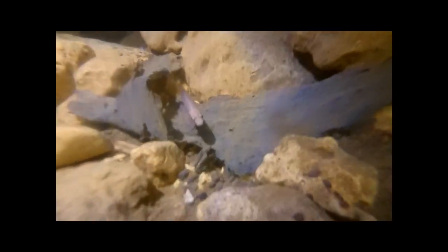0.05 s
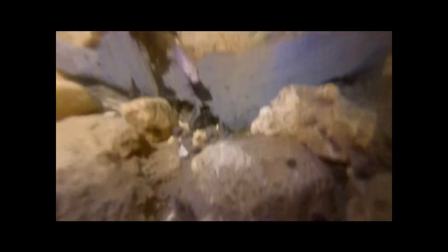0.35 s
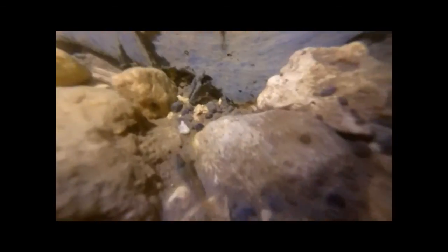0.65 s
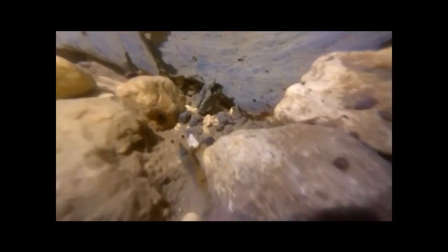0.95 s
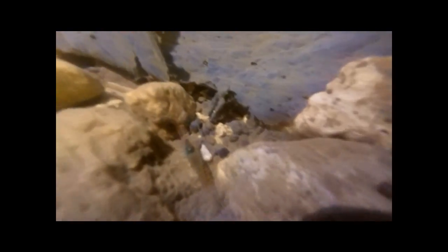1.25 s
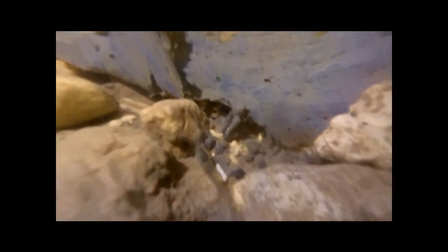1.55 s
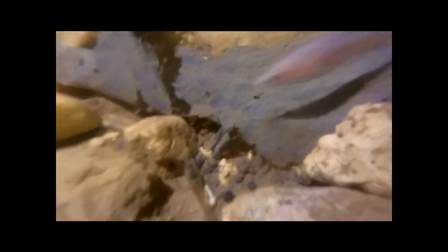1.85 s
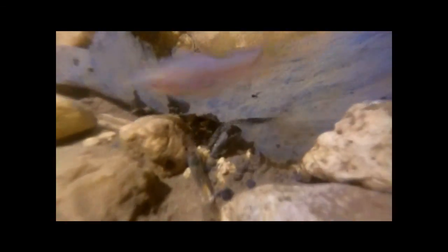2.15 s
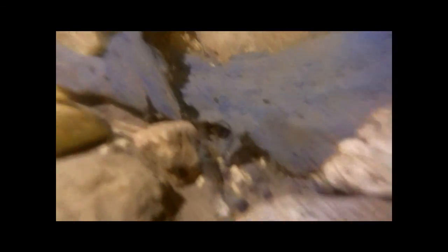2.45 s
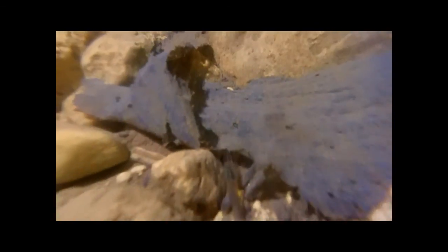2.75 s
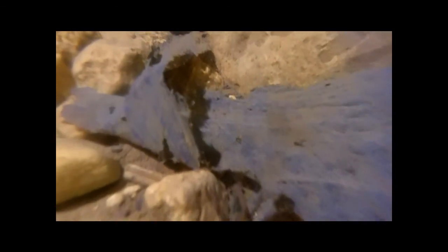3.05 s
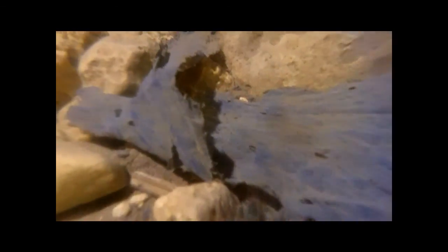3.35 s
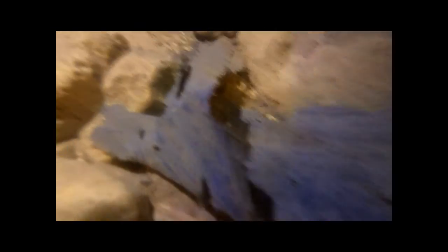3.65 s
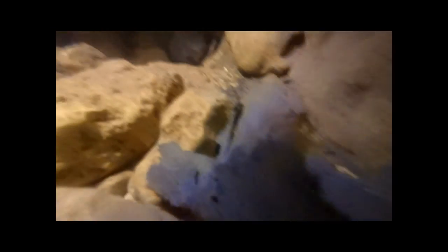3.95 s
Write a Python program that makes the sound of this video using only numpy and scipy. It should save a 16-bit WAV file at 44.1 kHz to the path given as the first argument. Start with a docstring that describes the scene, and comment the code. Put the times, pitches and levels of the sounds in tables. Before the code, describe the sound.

Water drips into a still pool in a quiet rock hollow: one clear plop, two faint ones, then another clear one. Underneath, a hand-held microphone picks up deep rumble, soft rustling and a thin, high hiss.

```python
"""A quiet rock hollow with a still pool, heard through the microphone of a hand-held camera.
Air and the moving hand make a deep rumble and, right at the microphone, a soft rustle.
Two clear drips and two faint ones plop, short and dry; a weak low tone rings near the end.
A thin, high hiss flickers and dips briefly, with fine ticking and a tiny pip about once a second."""
import sys
import numpy as np
from scipy import signal
from scipy.fft import rfft, irfft
from scipy.io import wavfile
from scipy.ndimage import uniform_filter1d

SR = 44100
rng = np.random.default_rng(int(sys.argv[2]) if len(sys.argv) > 2 else 0)


def bounce(signal):
    """Save signal as a 16-bit WAV file at the path given by the first command-line argument."""
    frames = np.transpose(np.atleast_2d(signal))
    limited = np.clip(frames, -1, 1)
    pcm = np.round(limited * 32767).astype(np.int16)
    wavfile.write(sys.argv[1], SR, pcm)


N = 176400


def undb(db):
    """Decibels to gain."""
    return 10 ** (np.asarray(db) / 20)


def curve(rows):
    """Gain over time through points of t/s, level/dB."""
    return undb(np.interp(np.arange(N) / SR, *np.array(rows).T))


def noise(colour):
    """Noise of rms 1, its spectrum shaped by points of f/Hz, level/dB and falling past both ends."""
    hz, db = np.array(colour, float).T
    f = np.maximum(np.arange(N // 2 + 1) * SR / N, 1e-3)
    gain = undb(np.interp(np.log(f), np.log(hz), db))
    skirts = np.minimum(f / hz[0], 1) ** 2 * np.minimum(hz[-1] / f, 1) ** 2
    y = irfft(rfft(rng.standard_normal(N)) * gain * skirts, N)
    return y / y.std()


def walk(rate):
    """Smooth random drift of spread 1, changing about rate times a second."""
    step = max(int(SR / rate), 1)
    stairs = np.repeat(rng.standard_normal(N // step + 1), step)
    y = uniform_filter1d(stairs, step)[:N]
    return y / y.std()


def swells(rows, attack_s, release_s):
    """Envelope that rises, holds and dies away for each row of t/s, length/s, level/dB."""
    t, power = np.arange(N) / SR, np.zeros(N)
    for start, length, db in rows:
        rise = np.clip((t - start) / attack_s, 0, 1)
        fall = np.exp(-np.maximum(t - start - length, 0) / release_s)
        power += (undb(db) * rise * fall) ** 2
    return np.sqrt(power)


def fade(t, t60):
    """Decay by 60 dB in t60 seconds."""
    return np.exp(-np.log(1000) * t / t60)


def rumble():
    """Slow air pressure and the sway of the hand, felt by the microphone as a deep rumble."""
    # rumble spectrum: f/Hz, level/dB
    colour = [(3, 3.5), (10, -9), (20, -6.5), (30, -17), (42, -26.5), (60, -34.5), (80, -42.5), (120, -50),
              (250, -62.5), (600, -77)]
    # its rise and fall: t/s, level/dB
    levels = [(0, -41), (.22, -51.5), (.32, -39.5), (.72, -43), (.85, -46), (.97, -42.5), (1.3, -45.5),
              (2.0, -46.5), (2.35, -47.5), (2.6, -47.5), (3.2, -51), (3.6, -51), (4, -42.5)]
    return noise(colour) * curve(levels)


def still_air():
    """The steady, faint wash of air in the hollow."""
    # air spectrum: f/Hz, level/dB
    colour = [(60, 9), (130, -2.5), (250, -5.5), (450, -8.5), (680, -8.5), (850, -12.5), (1500, -14.5),
              (2700, -15.5), (3500, -18), (5000, -19.5), (8000, -19.5), (15000, -26)]
    return noise(colour) * undb(-78)


def side_air():
    """The trace of air that differs between left and right."""
    # spectrum of that trace: f/Hz, level/dB
    colour = [(25, 38), (60, 22.5), (125, 2), (500, -8), (2000, -3.5), (4500, 3.5), (8000, -2.5),
              (15000, -15)]
    return noise(colour) * undb(-93)


def high_hiss():
    """A thin, high hiss that flickers and dips briefly."""
    # hiss spectrum: f/Hz, level/dB
    colour = [(4500, -16.5), (5100, -14.5), (5280, -3.5), (5800, -10.5), (7300, -10.5), (8000, -1.5),
              (8250, -6.5), (8550, 3), (9100, 3), (9400, -8.5), (10150, -13), (10480, -1.5), (10900, -6.5),
              (11900, -2), (12500, -4.5), (13300, 0), (14300, -2), (15300, -5.5)]
    # slow drift, before dips and flicker: t/s, level/dB
    levels = [(0, -81.5), (.7, -83.5), (1.1, -80), (1.6, -83.5), (2.0, -81), (3.25, -81), (3.6, -84.5),
              (4, -82)]
    # brief dips: t/s, length/s
    dips = [(0.624, .04), (0.725, 0.077), (0.847, 0.08), (1.321, 0.077), (1.45, 0.077), (1.61, 0.059),
            (1.723, 0.076), (1.88, 0.037), (3.356, 0.037), (3.432, 0.061), (3.662, 0.1), (3.81, 0.022),
            (3.92, 0.074)]
    dip_db, edge_s = -9.5, 0.004
    t = np.arange(N) / SR
    dipped = sum((t > start) * (t < start + length) * 1. for start, length in dips)
    dipped = uniform_filter1d(dipped, int(edge_s * SR) + 1)
    return noise(colour) * curve(levels) * undb(dip_db * dipped + walk(rate=58))


def ticks():
    """Very fine, irregular high ticks in the hiss; each sets off a short burst of sizzle."""
    # ringing modes of a tick: f/Hz, relative level/dB
    modes = [(5290, -6.5), (5700, -9.5), (6050, -20.5)]
    # sizzle spectrum: f/Hz, level/dB
    sizzle_colour = [(5200, -5.5), (6500, -9), (7900, -4), (8700, 1.5), (9600, -5.5), (10200, -3),
                     (10480, 5), (10850, -6), (12000, -5.5), (14500, -4)]
    ticks_per_s, sizzle_db = 16, -4.5
    t = np.arange(SR // 8) / SR
    ring = sum(undb(db) * np.sin(2 * np.pi * hz * t) for hz, db in modes) * fade(t, t60=0.02)
    spacing, strength = rng.random(size=(120, 2)).T
    gaps_s = (.25 + 2.25 * spacing ** 2) / ticks_per_s
    onsets = (np.cumsum(gaps_s) * SR).astype(int)
    kicks = np.bincount(onsets, undb(-73 + 4 * strength), N)[:N]
    bursts = signal.fftconvolve(kicks, fade(t, t60=0.073))[:N]
    sizzle = undb(sizzle_db) * bursts * noise(sizzle_colour)
    return signal.fftconvolve(kicks, ring)[:N] + sizzle


def pips():
    """Tiny high blips of electrical interference."""
    # peak of each pip: t/s, level/dB
    peaks = [(.18, -76), (.972, -82), (1.957, -77), (2.981, -74)]
    # partials of a pip: f/Hz, relative level/dB
    partials = [(9000, 1), (12350, -8), (13520, 7.5)]
    half_width_s = .0055
    t = np.arange(N) / SR
    whine = sum(undb(db) * np.sin(2 * np.pi * hz * t) for hz, db in partials)
    return whine * sum(undb(db) * np.exp(-((t - at) / half_width_s) ** 2) for at, db in peaks)


def handling():
    """The hand on the camera body: uneven rubbing, soft bumps, light brushing and one faint click."""
    # spectra of the four kinds of contact: f/Hz, level/dB
    rub_colour = [(80, -7), (180, 1), (300, -2), (440, -2.5), (530, -6.5), (650, 4), (730, -10), (850, -18),
                  (1500, -33.5), (3000, -44), (6000, -56)]
    bump_colour = [(50, 4.5), (110, 4.5), (200, -3.5), (390, -5), (550, -18), (900, -25.5), (2500, -27.5),
                   (6000, -38)]
    brush_colour = [(700, 2.5), (1200, -8.5), (2600, -4), (3500, -15), (6000, -9), (10000, -16.5)]
    click_colour = [(1500, -8), (2600, -1), (4200, -7), (6000, -13)]
    # touches of the hand: t/s, length/s, level/dB
    rubs = [(.30, 0.14, -78.5), (.46, 0.288, -75.5), (.78, 0.24, -84.5), (1.09, 0.13, -78.5),
            (1.26, 0.22, -83.5), (1.67, .22, -74.5), (1.9, 0.21, -82.5), (3.08, .35, -75.5),
            (3.44, 0.48, -81), (3.9, 0.16, -76.5)]
    bumps = [(.25, 0.097, -72), (.66, 0.061, -68.5), (.94, 0.038, -67.5), (1.07, 0.039, -78),
             (1.35, 0.023, -80), (1.97, 0.03, -70), (2.08, 0.021, -85), (2.57, 0.013, -66),
             (2.90, 0.018, -71.5), (3.19, .04, -83)]
    brushes = [(.32, 0.3, -82)]
    rub_rough_db, brush_rough_db = 1.5, 2
    rub = noise(rub_colour) * swells(rubs, attack_s=0.01, release_s=.025)
    rub *= undb(rub_rough_db * walk(rate=45))
    bump = noise(bump_colour) * swells(bumps, attack_s=0.0034, release_s=0.023)
    brush = noise(brush_colour) * swells(brushes, attack_s=0.01, release_s=.025)
    brush *= undb(brush_rough_db * walk(rate=60))
    click = noise(click_colour) * swells([(1.399, 0.0012, -75.5)], attack_s=0.00066, release_s=0.003)
    return rub + bump + brush + click


def drips():
    """Each drop on the pool makes a hollow thud, a briefly ringing bubble and a trace of splash."""
    # drops: t/s, level/dB, bubble f/Hz, bubble relative level/dB, bubble t60/s
    drops = [(1.1903, -48.5, 1297, 10.5, 0.028), (2.0685, -69, 933, 12, 0.024),
             (2.8680, -66.5, 680, -7, 0.01), (3.4676, -47, 1248, 8.5, 0.034)]
    # modes of the thud under every drop: f/Hz, relative level/dB, t60/s
    thud_modes = [(158, -24, 0.06), (402, -1, 0.037), (452, -2, 0.045), (640, 3, 0.021), (1040, -17, 0.03)]
    # splash spectrum: f/Hz, level/dB
    splash_colour = [(1500, -6), (2300, 8.5), (2900, -9), (3500, -4.5), (4500, -13)]
    bubble_attack_s, plop_top_hz, splash_db = 0.0012, 1420, -23.5
    out, t = np.zeros(N), np.arange(SR // 8) / SR
    thud = sum(undb(db) * np.sin(2 * np.pi * hz * t) * fade(t, t60) for hz, db, t60 in thud_modes)
    bubble_rise = 1 - np.exp(-t / bubble_attack_s)
    lowpass = signal.butter(8, plop_top_hz, fs=SR, output="sos")
    spray = noise(splash_colour)
    for start, db, hz, bubble_db, t60 in drops:
        i = int(start * SR)
        bubble = undb(bubble_db) * np.cos(2 * np.pi * hz * t) * fade(t, t60) * bubble_rise
        plop = signal.sosfilt(lowpass, thud + bubble)
        splash = undb(splash_db) * spray[i:i + len(t)] * fade(t, t60=0.045)
        out[i:i + len(t)] += undb(db) * (plop + splash)
    return out


def low_tone():
    """A weak, slightly wavering tone that swells twice."""
    pitch_hz, waver = 263, 0.0068
    phase = 2 * np.pi * np.cumsum(pitch_hz * (1 + waver * walk(rate=20))) / SR
    envelope = swells([(3.54, 0.12, -74), (3.73, .2, -81)], attack_s=0.028, release_s=.03)
    return np.sqrt(2) * np.sin(phase) * envelope


def scene():
    """Everything sits in the centre; only a trace of air gives the hollow width."""
    mid = rumble() + handling() + drips() + low_tone() + still_air() + high_hiss() + ticks() + pips()
    side = side_air()
    return np.array([mid + side, mid - side])


def record(dry):
    """The camera's recorder cuts the top treble steeply."""
    top_hz = 15200
    return signal.sosfilt(signal.ellip(10, .1, 70, top_hz, fs=SR, output="sos"), dry)


dry = scene()
out = record(dry)
bounce(out)
```